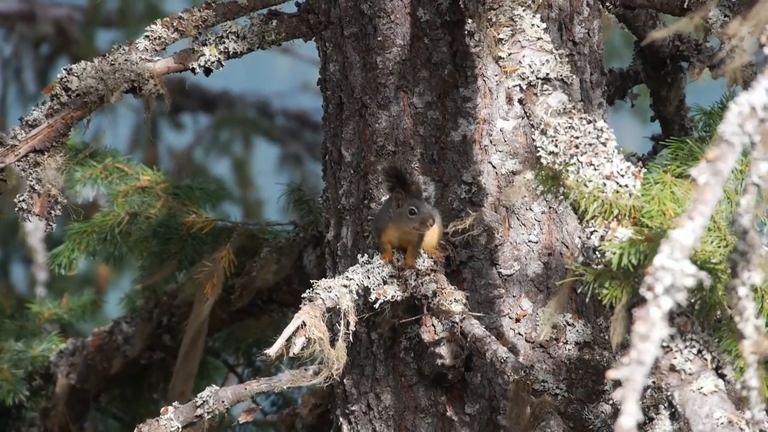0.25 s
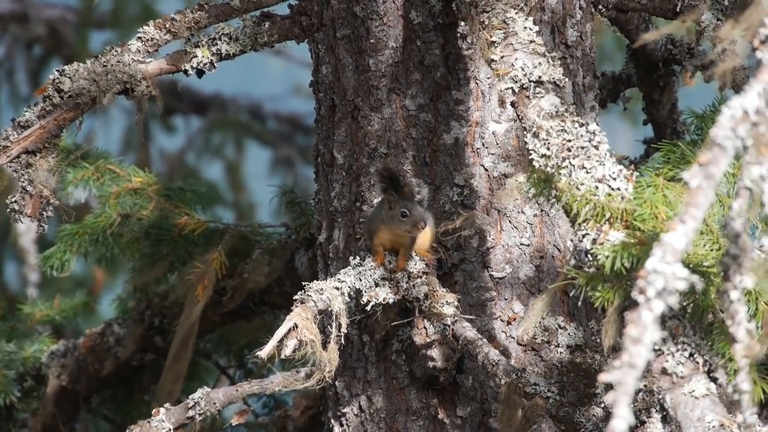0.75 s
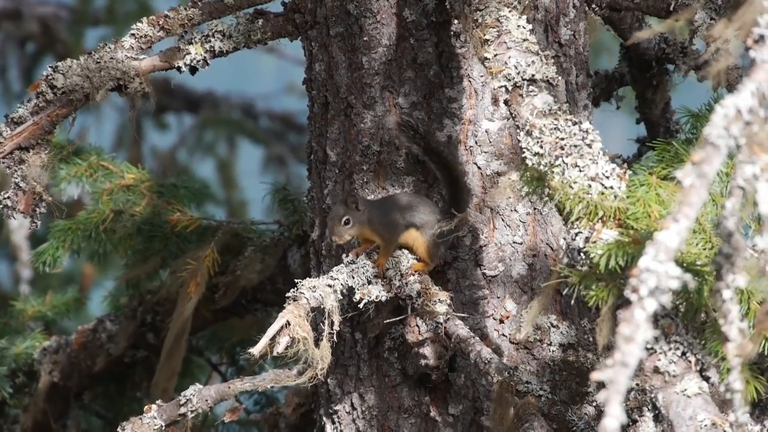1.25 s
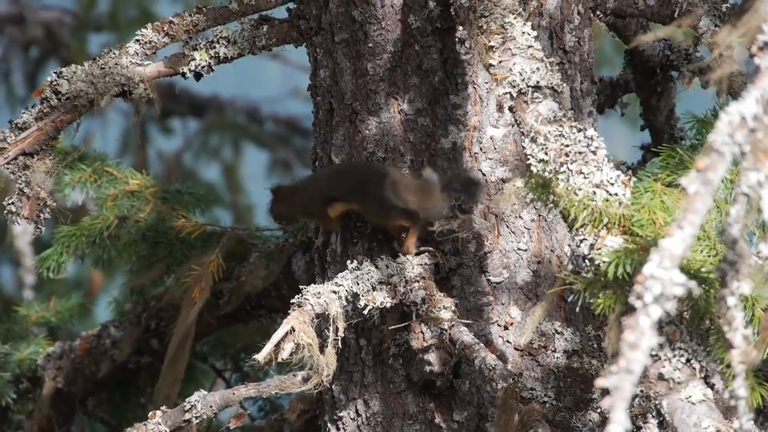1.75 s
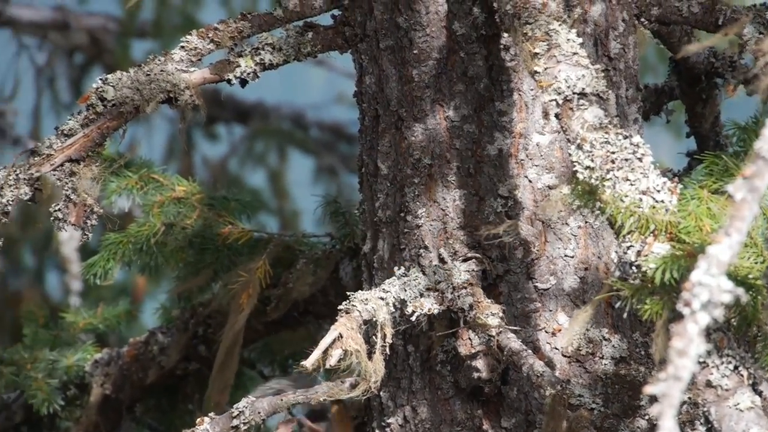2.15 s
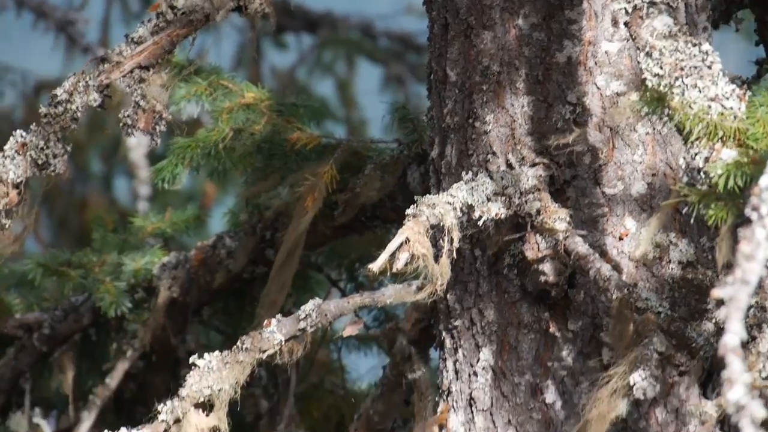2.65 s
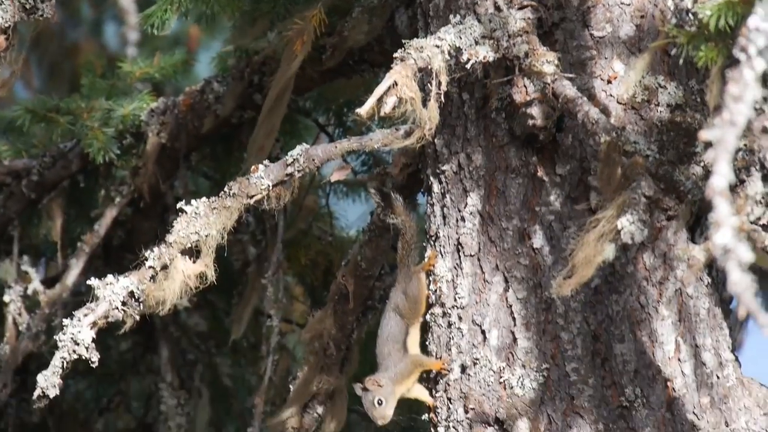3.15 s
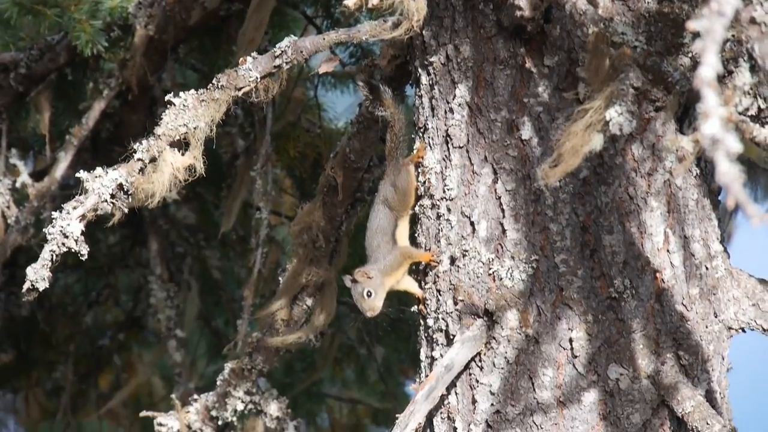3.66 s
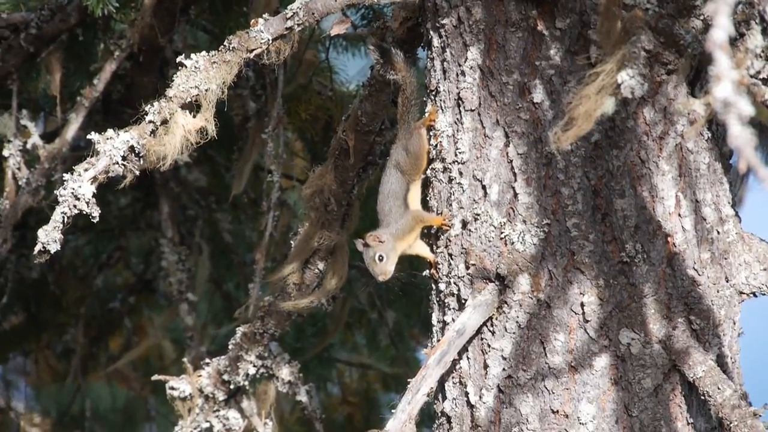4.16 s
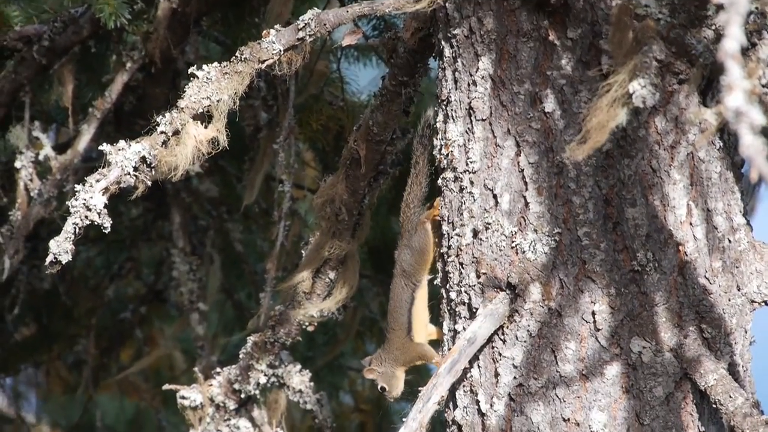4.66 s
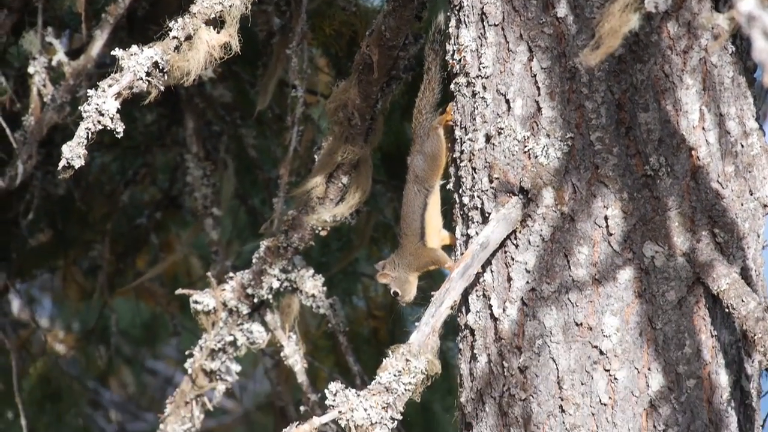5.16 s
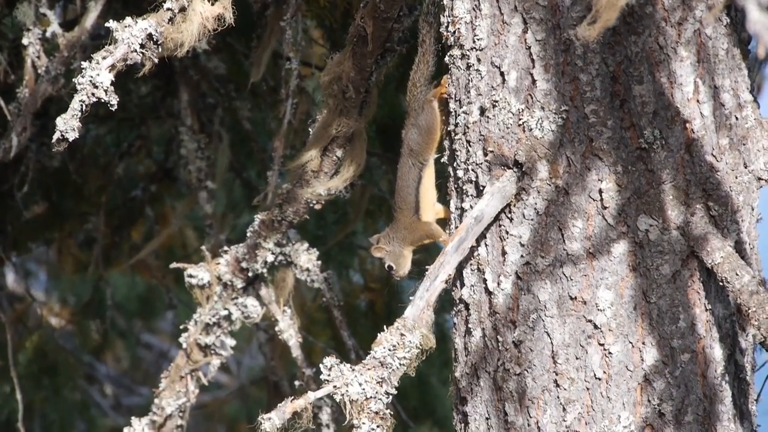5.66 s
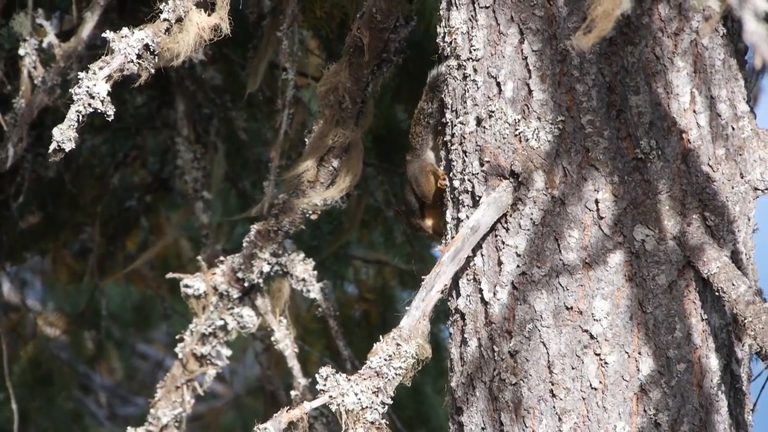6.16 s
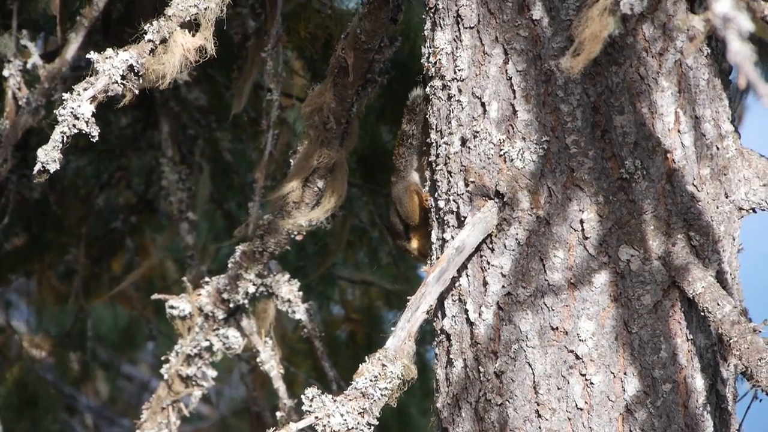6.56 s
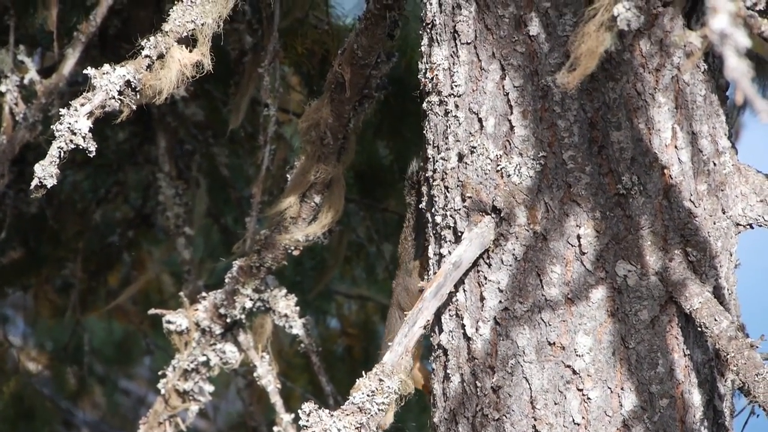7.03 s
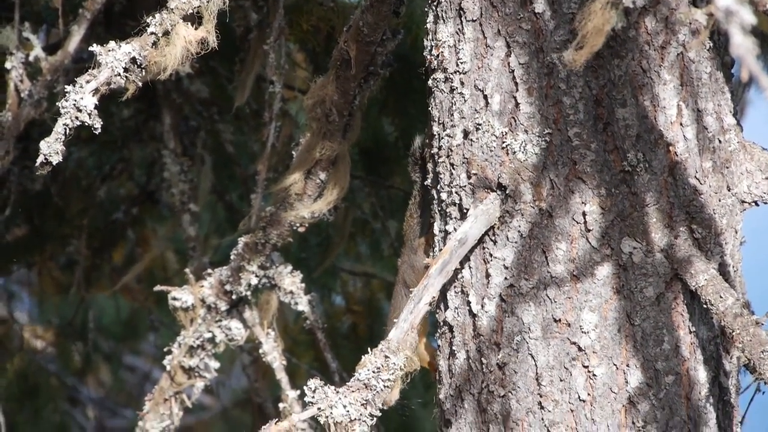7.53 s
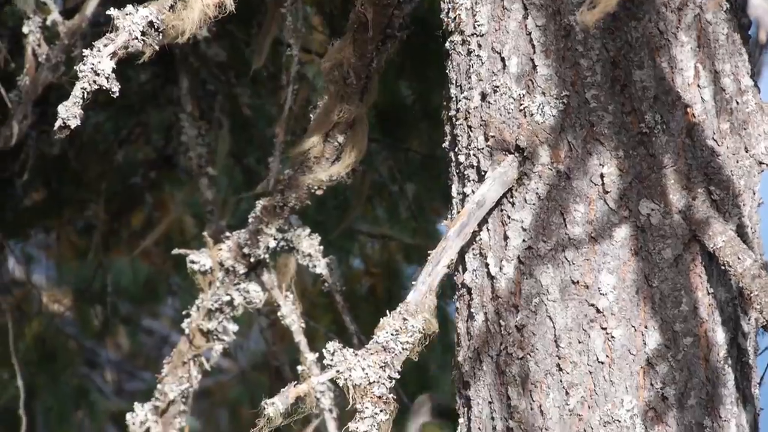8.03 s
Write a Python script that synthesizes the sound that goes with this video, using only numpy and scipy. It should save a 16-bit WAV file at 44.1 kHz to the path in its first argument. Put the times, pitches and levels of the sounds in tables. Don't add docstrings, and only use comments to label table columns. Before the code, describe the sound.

Outdoors in a conifer forest, a faint low squirrel note and a flurry of dry claw ticks on bark lead to thin wavering whistles, then five falling alarm chirps at uneven intervals, some soft, some loud and raspy. Another waver ends it. Wind thumps low on the right side of a hand-held microphone, its case ticking occasionally, over a steady distant rush of air and water.

```python
import sys
import numpy as np
from scipy import signal
from scipy.fft import rfft, irfft, next_fast_len
from scipy.io import wavfile
from scipy.ndimage import uniform_filter1d, map_coordinates

SR = 44100
rng = np.random.default_rng(int(sys.argv[2]) if len(sys.argv) > 2 else 0)


def file_out(sig):
    cols = np.atleast_2d(sig).T
    lim = np.clip(cols, -1, 1)
    pcm = np.round(lim * 32767).astype(np.int16)
    wavfile.write(sys.argv[1], SR, pcm)


def amplitude_ratio(level_db):
    exponent = np.asarray(level_db, float) / 20
    return 10 ** exponent


N = 365588
SCOOP_S = .0065


def unit(x):
    return x / np.sqrt(np.mean(x ** 2) + 1e-20)


def along(points, hz):
    f, v = np.transpose(points)
    return np.interp(np.log(hz + 1), np.log(f + 1), v)


def wobble(rate, size=N):
    knots = rng.standard_normal(int(size * rate / SR) + 4)
    return map_coordinates(knots, [np.arange(size) * rate / SR])


def filtered(x, response):
    m = next_fast_len(N + 8192)
    return irfft(rfft(x, m) * response(np.fft.rfftfreq(m, 1 / SR)), m)[..., :N]


def placed(x, balance):
    return filtered(x, lambda hz: amplitude_ratio(np.outer([.5, -.5], along(balance, hz))))


def add(track, s, sound):
    part = track[round(s * SR):][:len(sound)]
    part += sound[:len(part)]


def spread(events, width):
    power = np.zeros(N)
    for s, db, *_ in events:
        power[round(s * SR)] = amplitude_ratio(2 * db) * SR / 100
    box = int(width * SR)
    return np.sqrt(np.abs(uniform_filter1d(uniform_filter1d(power, box), box)))


def eddies():
    # (time [s], peak level [dB], frequency [Hz])
    strong = [(.834, -37, 173), (1.514, -31, 139), (1.777, -30.5, 212), (1.842, -28, 180),
              (1.893, -28, 206), (2.021, -33, 183), (2.435, -32, 244), (2.489, -29, 183), (2.951, -30, 190),
              (3.037, -32, 160), (3.178, -28, 190), (3.229, -30, 164), (3.315, -29.5, 166),
              (3.42, -28.5, 142), (3.642, -26, 214), (3.801, -32.5, 200), (4.008, -34, 175),
              (4.413, -33.5, 154), (4.809, -34, 181), (4.973, -34, 153), (5.382, -32, 142),
              (6.251, -37.5, 171), (6.509, -34.5, 290), (6.765, -34, 124), (7.3, -38.5, 190),
              (7.616, -29.5, 164), (7.71, -33.5, 190), (7.893, -27.5, 182), (7.975, -27, 160),
              (8.216, -30, 189)]
    # (time [s], level [dB])
    gust_strength = [(0, -67), (.85, -61), (1.02, -76), (1.6, -74), (1.78, -51), (2.12, -66), (2.29, -68),
                     (2.4, -48.5), (3.3, -47.5), (4.2, -54), (4.32, -60), (4.7, -58), (5.1, -55),
                     (5.8, -61), (6.1, -66), (7.3, -63), (7.85, -49), (8.29, -47)]
    per_s = 18
    luck = rng.standard_normal((int(N / SR * per_s), 3))
    s = (np.arange(len(luck)) + .5 + .4 * luck[:, 0]) / per_s
    s = np.clip(s, .03, N / SR - .01)
    db = np.interp(s, *np.transpose(gust_strength)) + 13.5 + 2.2 * luck[:, 1]
    hz = 175 * np.exp(.2 * luck[:, 2])
    return strong + list(zip(s, db, hz))


def wind():
    # (frequency [Hz], level [dB per Hz])
    churn_colour = [(15, -69), (25, -46.5), (92, -4.5), (118, -2), (205, -8), (692, -30.5), (800, -39.5),
                    (1040, -61), (1760, -120)]
    right = np.zeros(N)
    t = np.arange(-1024, 1024) / SR
    thumps = eddies()
    for (s, db, hz), (turn, snap) in zip(thumps, rng.random((len(thumps), 2))):
        swing = np.exp(-(t * hz / 0.69) ** 2) * np.cos(2 * np.pi * (hz * t + turn))
        edge = np.exp(-(t * hz / 0.3) ** 2) * np.cos(2 * np.pi * (1.59 * hz * t + snap))
        edge_gain = amplitude_ratio(0.67 * (db + 31) - 10.5)
        add(right, s + t[0], amplitude_ratio(db + 3.5) * (swing + edge_gain * edge))

    gust = spread(thumps, width=0.07) + amplitude_ratio(-54)
    churn = []
    for port in "LR":
        noise = filtered(rng.standard_normal(N), lambda hz: amplitude_ratio(along(churn_colour, hz)))
        churn.append(unit(amplitude_ratio(4.37 * wobble(35)) * unit(noise)))
    right = filtered(right, lambda hz: hz ** 2 / (hz ** 2 + 45 ** 2))
    right += amplitude_ratio(-3.5) * gust ** 0.88 * amplitude_ratio(-6.5) * churn[1]
    leak = filtered(right, lambda hz: amplitude_ratio(-14) - amplitude_ratio(-2.0) * hz ** 2 / (hz ** 2 + 230 ** 2))
    left = leak + (amplitude_ratio(-22) * gust + amplitude_ratio(-73.5)) * churn[0]
    return np.array([left, right])


def forest(patchy_db=1.78):
    # (frequency [Hz], level [dB per Hz])
    rush_colour = [(250, -15), (600, -15), (1500, -16.5), (2600, -20.5), (3700, -20.5), (4500, -25.5),
                   (5000, -24), (7250, -31), (14800, -38.5), (15700, -39)]
    # (frequency [Hz], correlation [0-1])
    coherence = [(400, 0.26), (640, 0.73), (1400, 0.55), (3100, 0.67), (6800, .52), (15000, 0.18)]
    # (frequency [Hz], left over right [dB])
    lean = [(400, 7), (700, -1), (1290, 2), (2400, -1), (4400, 1.5), (15000, 0)]
    # (centre [Hz], width [Hz], level [dB])
    hollows = [(720, 77, -11), (799, 45, -6), (919, 74, -6.5), (1141.4, 116, -3.5), (1292, 102, -8),
               (1948, 51, -14)]
    # (time [s], level [dB])
    swell_level = [(0, -0.5), (2.6, 0), (2.9, -4), (4.1, -4.5), (4.5, -0.5), (7.4, 0), (7.7, -2.5),
                   (8.29, -5.5)]

    def share(hz):
        turn = np.arccos(np.clip(along(coherence, hz), -1, 1)) / 2
        return np.array([np.cos(turn), np.sin(turn)])

    def rings(hz):
        return np.sqrt(sum(amplitude_ratio(2 * db) / (1 + (2 * (hz - c) / w) ** 4) for c, w, db in hollows))

    z = signal.stft(rng.standard_normal((2, 2, N)), nperseg=512)[2]
    patches = rng.standard_normal(z.shape[2:])
    patches = unit(uniform_filter1d(uniform_filter1d(patches, 4, 0), 12, 1))
    airy, hollow = signal.istft(z * amplitude_ratio(patchy_db * patches), nperseg=512)[1][..., :N]
    swell = amplitude_ratio(np.interp(np.arange(N) / SR, *np.transpose(swell_level)))
    rush = filtered(airy, lambda hz: amplitude_ratio(along(rush_colour, hz)) * share(hz))
    ringing = filtered(hollow, lambda hz: rings(hz) * share(hz))
    mid, side = rush * swell ** 0.19 + swell * ringing
    return amplitude_ratio(-57.5) * placed(unit(np.array([mid + side, mid - side])), lean)


def resonances(modes, f):
    total = 0
    for k, (c, w, db) in enumerate(modes):
        total = total + (-1) ** k * amplitude_ratio(db) * 1j * f * w / (c * c - f * f + 1j * f * w)
    return total


def tick(modes, t60):
    t = np.arange(2048) / SR
    burst = rfft(rng.standard_normal(len(t)) * amplitude_ratio(-60 * t / t60))
    sound = irfft(burst * resonances(modes, np.fft.rfftfreq(len(t), 1 / SR)) ** 2)
    return sound / np.abs(sound).max()


def claws():
    # (time [s], peak level [dB], centre [Hz])
    strikes = [(1.0964, -53, 6890), (1.1194, -46.5, 7770), (1.1438, -45, 7010), (1.159, -46, 5620),
               (1.1744, -50, 5150), (1.2516, -48, 10200), (1.706, -43, 10500), (1.714, -39, 7300),
               (1.7468, -40.5, 5800), (1.8143, -49.5, 5380), (1.8612, -57, 6830), (1.8756, -42, 5430),
               (1.9235, -50, 8510), (1.9422, -35, 7960), (1.986, -44, 5680), (2.2496, -45.5, 6300),
               (2.3474, -45.5, 4970), (6.2976, -52, 5150), (6.7305, -45, 9600), (7.2789, -51.5, 9090)]
    out = np.zeros(N)
    for s, db, hz in strikes:
        add(out, s, amplitude_ratio(db + 2.0) * tick([(hz, 0.57 * hz, 0)], t60=0.0084))
    grit = rng.standard_normal(N) * amplitude_ratio(3 * wobble(160))
    out += amplitude_ratio(-24) * unit(grit) * spread(strikes, width=.03) ** 0.8
    # (frequency [Hz], level [dB])
    bark = [(1500, -22), (4500, -4.5), (8000, 0.5), (11500, -0.5), (13000, -11), (16000, -18)]
    return filtered(out, lambda hz: amplitude_ratio(along(bark, hz)))


def trees(x):
    t = np.arange(SR // 2) / SR
    tail = rng.standard_normal((2, len(t))) * amplitude_ratio(-60 * t / .45) * (t > .003)
    tail = tail / np.linalg.norm(tail[0])
    return amplitude_ratio(-19) * signal.fftconvolve(x[None], tail, axes=1)[:, :N]


def glide(t, held, top_hz, climb_hz, drop_hz, sag):
    drop_s, collapse_s = .035, .07
    after = np.clip(t - held, 0, None)
    overshoot = 70 * np.exp(-(t / SCOOP_S - 2) ** 2)
    scoop = overshoot - 850 * np.exp(-(t / SCOOP_S) ** 2)
    climb = climb_hz * np.clip(t / held, 0, 1) ** 3
    drop = drop_hz * (1 - np.exp(-(after / drop_s) ** 2))
    collapse = np.clip(t - t[-1] + collapse_s, 0, None) ** 2 / collapse_s
    return top_hz + scoop + climb - drop - sag * (after + collapse)


def calls():
    # (time [s], fundamental level [dB])
    effort = [
        [(2.611, -38.5), (2.645, -41), (2.66, -48.5), (2.685, -40), (2.712, -38), (2.752, -41), (2.79, -53),
         (2.832, -57), (2.87, -61)],
        [(4.415, -35.5), (4.423, -54), (4.429, -35), (4.452, -31.5), (4.469, -51), (4.479, -37.5), (4.505, -42),
         (4.556, -38.5), (4.61, -62)],
        [(5.93, -44), (5.94, -54), (5.945, -39), (5.958, -38), (5.968, -41), (5.98, -63), (5.992, -42),
         (6.048, -43), (6.115, -59)],
        [(6.85, -35.5), (6.856, -43), (6.886, -35), (6.918, -41), (6.968, -35.5), (7.012, -40), (7.045, -54),
         (7.08, -61)],
        [(7.941, -42), (7.951, -42), (7.954, -52), (7.958, -38.5), (7.973, -37.5), (7.995, -46), (8.015, -38),
         (8.03, -39), (8.04, -47)],
    ]
    # (held [s], top [Hz], late climb [Hz], quick drop [Hz], slow sag [Hz per s])
    glides = [(.052, 1940, 160, 430, 4400), (.047, 2105, 65, 240, 6800), (.046, 2125, 75, 700, 3600),
              (.039, 1975, 145, 530, 3300), (.04, 2065, 95, 420, 50)]
    # (time [s], pitch [Hz], fundamental level [dB])
    wavers = [
        [(1.912, 1800, -53), (1.93, 1640, -54), (1.95, 1803, -45), (1.986, 1924, -57.5), (2.003, 1893, -45),
         (2.022, 1780, -52)],
        [(2.04, 1790, -54), (2.073, 1810, -48.5), (2.107, 1946, -38.5), (2.126, 2003, -41.5),
         (2.138, 1814, -37), (2.153, 1842, -37.5), (2.162, 1827, -46), (2.191, 1830, -39), (2.206, 1790, -68)],
        [(8.048, 1780, -48), (8.058, 1825, -43), (8.085, 1640, -48), (8.105, 1800, -44), (8.145, 1693, -58),
         (8.168, 1777, -44.5), (8.2, 1817, -44), (8.229, 1918, -39.5), (8.287, 1884, -42)],
        [(1.225, 760, -55), (1.24, 973, -49.5), (1.262, 1214, -45.5), (1.3, 1350, -42.5), (1.325, 1276, -43.5),
         (1.352, 1180, -41.5), (1.38, 994, -49), (1.405, 770, -63)],
    ]
    attack_s, attack_db, release_s, release_db = .003, 33, .04, 11
    for k, rows in enumerate(effort + wavers):
        s, *hz, db = np.transpose(rows)
        t = np.arange(s[0] - attack_s, s[-1] + release_s, 1 / SR)
        knots_db = np.r_[db[0] - attack_db, db, db[-1] - release_db]
        level = np.interp(t, np.r_[t[0], s, t[-1]], knots_db)
        pitch = np.interp(t, s, hz[0]) if hz else glide(t - t[0], *glides[k])
        yield t, pitch, level


def mouth(t, hz, level, opens, shuts, wide_db, bright_db, leak):
    # (frequency [Hz], level [dB])
    nose = [(1500, -18), (2100, -20), (2600, -26), (2900, -37), (3700, -29), (4100, -40)]
    inside = np.minimum(t - opens, shuts - t)
    before, since, after = (np.clip(v, 0, None) for v in (opens - t, t - opens, t - shuts))
    gape = wide_db - 1000 * (np.clip(.014 - inside, 0, None) + 4 * before)
    nasal_db = .6 * (level + 40) - 40 + along(nose, 2 * hz)
    octave_db = np.maximum(gape, nasal_db)
    open_db = np.maximum(bright_db - 11000 * before - 150 * since - 1300 * after, -85)
    smoothed = 10 * np.log10(np.abs(uniform_filter1d(amplitude_ratio(2 * level), int(.025 * SR))) + 1e-12)
    onset_dip = 14 * np.exp(-((t - t[0]) / (2 * SCOOP_S)) ** 4)
    leak_db = uniform_filter1d(np.where(inside > 0, *leak), 300)
    hiss_db = leak_db + .75 * (smoothed + 40) - 40 - onset_dip
    return octave_db, open_db, hiss_db


def chirps(flutter_db=1.5, jitter=.005, streak=1.1):
    # (opens [s], shuts [s], octave level [dB], overtone level [dB])
    jaws = [(2.617, 2.688, -80, -59), (4.4255, 4.463, -43, -44), (5.944, 5.973, -42, -49),
            (6.859, 6.908, -48, -56.5), (7.954, 7.984, -45.5, -63), (1.945, 2.018, -72, -61),
            (2.13, 2.206, -51, -90), (8.156, 8.31, -49, -90), (1.265, 1.365, -61, -90)]
    # (mouth open [dB], mouth shut [dB])
    leaks = [(-32, -23), (-23, -21), (-22, -29), (-22, -23), (-24, -30), (-26, -27), (-19, -16), (-28, -29),
             (-18.5, -18.5)]
    overtones = [(-4, -15, -18, -18, -24), (-14, -4.5, -1.5, -18, -27), (-15, 1.5, -12, -31, -32),
                 (0.5, -4, -2.5, -12, -26), (3, 1.5, 4, -27, -28), (-3, -20, -15, -15, -25)]
    hoarseness = [.07, .08, .07, .11, .15, .14, .14, .15, .05]
    # (frequency [Hz], level [dB])
    teeth = [(2500, -24), (6500, -14), (8300, -15), (8900, -9), (10500, -3), (11600, -13), (12300, -18),
             (14500, -22)]
    tone, air = np.zeros(N), np.zeros(N)
    shake, drift = wobble(1600), wobble(600)
    balances = overtones + overtones[-1:] * 3
    for (s, hz, first_db), jaw, leak, balance, rasp in zip(calls(), jaws, leaks, balances, hoarseness):
        t, hz, first_db = (v[s < (N - 1) / SR] for v in (s, hz, first_db))
        start = round(s[0] * SR)
        part = slice(start, start + len(t))
        octave_db, open_db, hiss_db = mouth(t, hz, first_db, *jaw, leak)
        open_db = open_db - 3 * np.clip(-70 - open_db, 0, None)
        unsteady = 1 + jitter * (1 + 5 * rasp) * wobble(111.7, size=len(t))
        phase = 2 * np.pi * np.cumsum(hz * unsteady) / SR

        gains = [amplitude_ratio(first_db), amplitude_ratio(octave_db)] + [amplitude_ratio(open_db + db) for db in balance]
        gains[2] = gains[2] + amplitude_ratio(octave_db - 23)
        voice = 0
        for k, gain in enumerate(gains, 1):
            flutter = amplitude_ratio(flutter_db * min(k, 2) * wobble(130, size=len(t)))
            partial = np.sin(k * phase + rasp * k ** .5 * shake[part])
            voice = voice + np.sqrt(2) * gain * flutter * partial

        pulses = sum(np.cos(k * phase) * (k * hz < SR / 3) for k in range(1, 17))
        puffs = unit(pulses) * drift[part]
        edges = signal.windows.tukey(len(t), .02)
        parting = np.clip(np.gradient(open_db) * SR / 22000.0 - .3, 0, 1)
        pop = amplitude_ratio(open_db.max() - 13.0) * parting
        add(tone, s[0], voice * edges + pop * np.diff(rng.standard_normal(len(t) + 1)))
        hiss = amplitude_ratio(hiss_db + 8.5 + 2.5 * wobble(47, size=len(t))) * edges
        add(air, s[0], hiss * (streak * puffs + rng.standard_normal(len(t))))
    hiss_colour = [(1200, -120)] + teeth + [(16000, -120)]
    return tone + filtered(air, lambda hz: amplitude_ratio(along(hiss_colour, hz)))


def creaks():
    # (time [s], peak level [dB], panel [0 or 1])
    slips = [
        (2.417, -47.5, 0),
        (3.854, -44, 0),
        (5.442, -40.5, 1),
        (7.502, -46, 1),
        (7.511, -46, 1),
        (7.53, -45, 1),
        (7.544, -42.5, 1),
    ]
    # (centre [Hz], width [Hz], level [dB])
    panels = [
        [(2010, 300, 5), (3940, 620, 0)],
        [(770, 310, 4), (3220, 520, -3.5)],
    ]
    out = np.zeros(N)
    for s, db, panel in slips:
        add(out, s, amplitude_ratio(db) * tick(panels[int(panel > .5)], t60=0.011))
    return out


def scene():
    # (frequency [Hz], left over right [dB])
    facing = [(1500, 2), (2800, 2), (4200, 8.5), (6500, 3.5), (10000, 3)]
    animal = chirps() + claws()
    return placed(animal, facing) + trees(animal) + creaks() + wind() + forest()


def top_cut(x):
    return signal.sosfilt(signal.butter(12, 16100, fs=SR, output="sos"), x)


def record(dry):
    mix = filtered(dry, lambda hz: hz < 15720)
    return top_cut(mix)


dry = scene()
out = record(dry)
file_out(out)
```